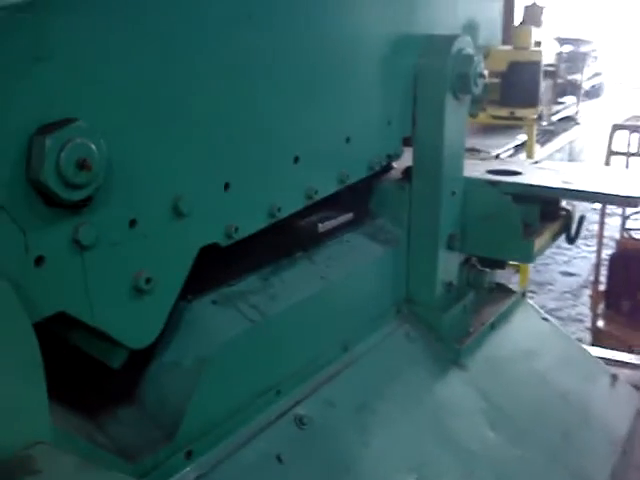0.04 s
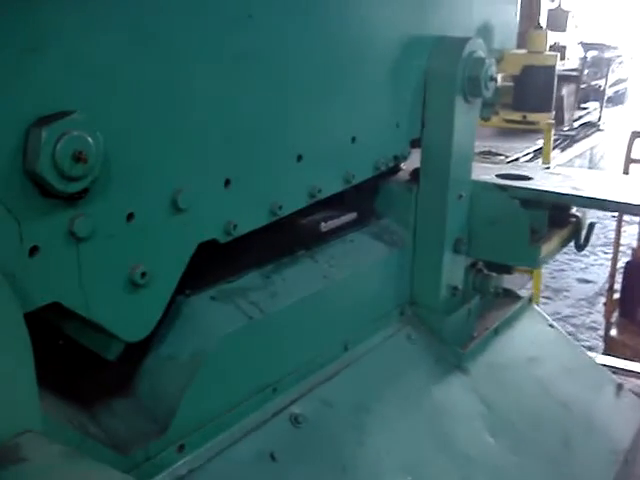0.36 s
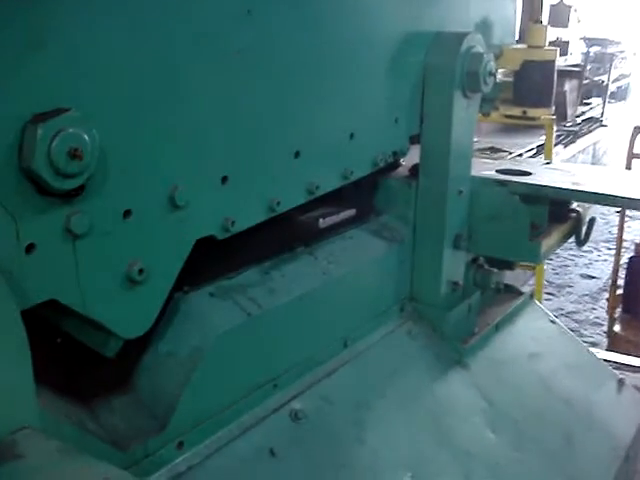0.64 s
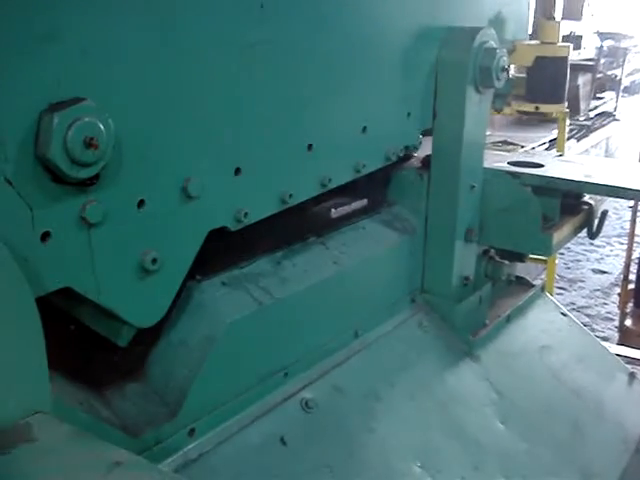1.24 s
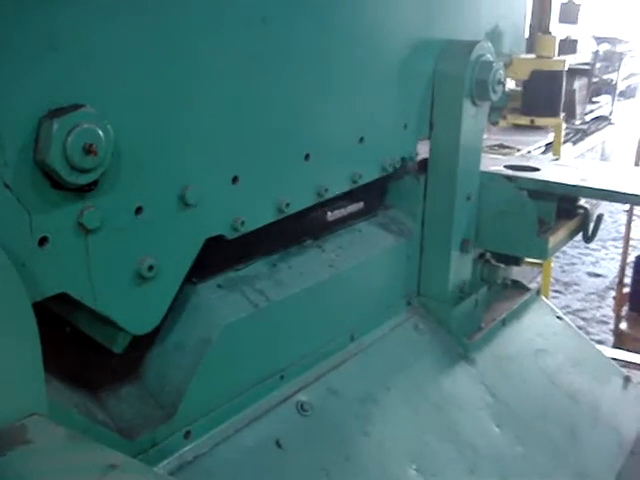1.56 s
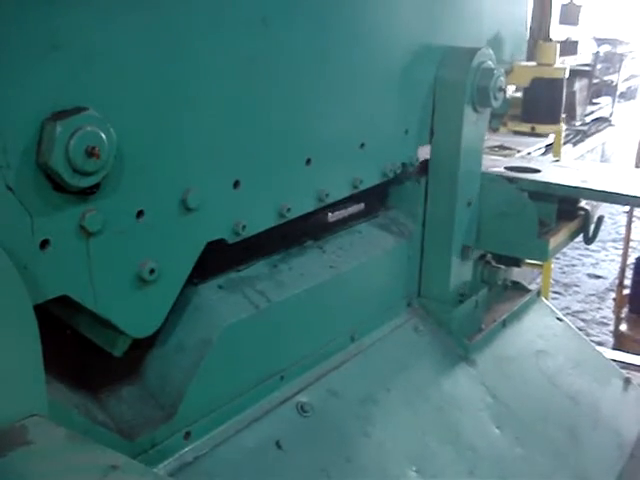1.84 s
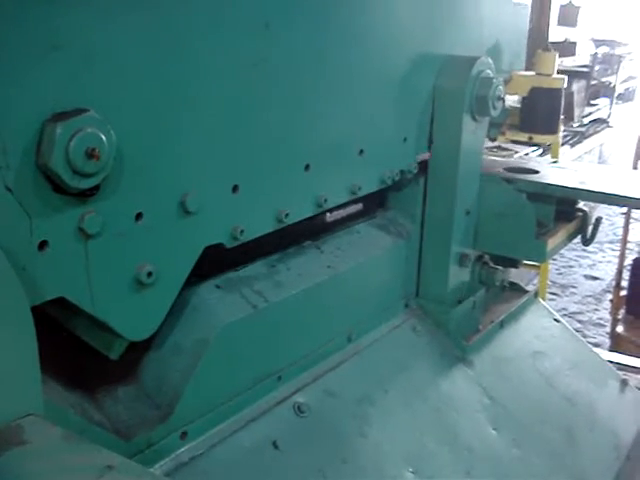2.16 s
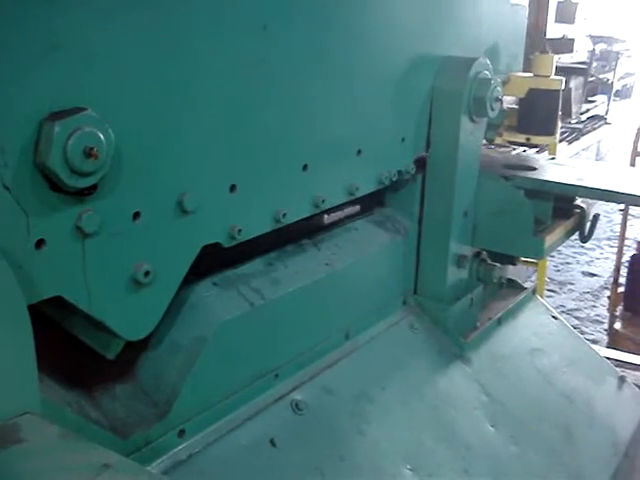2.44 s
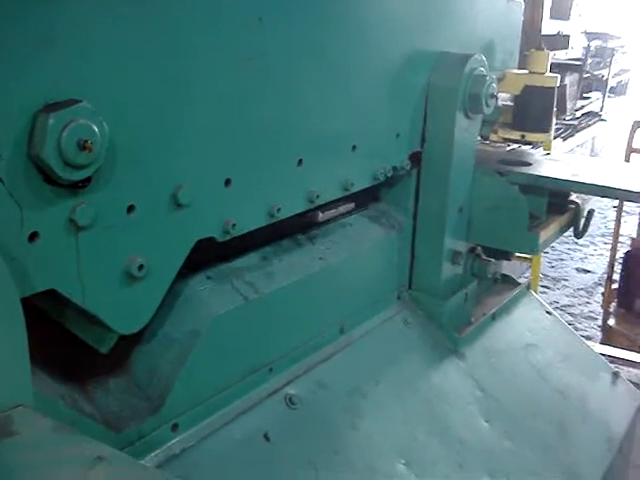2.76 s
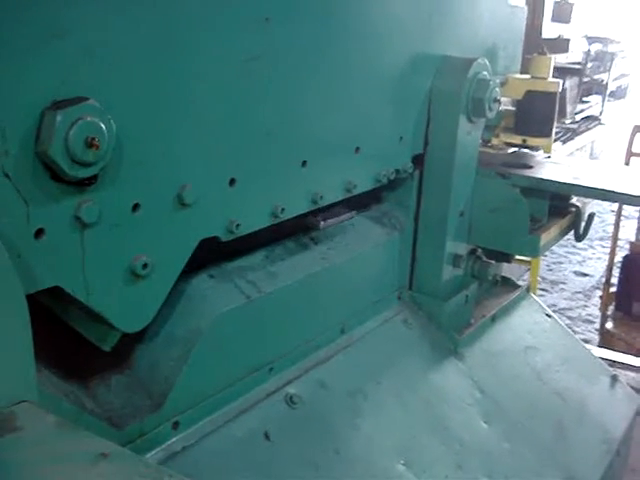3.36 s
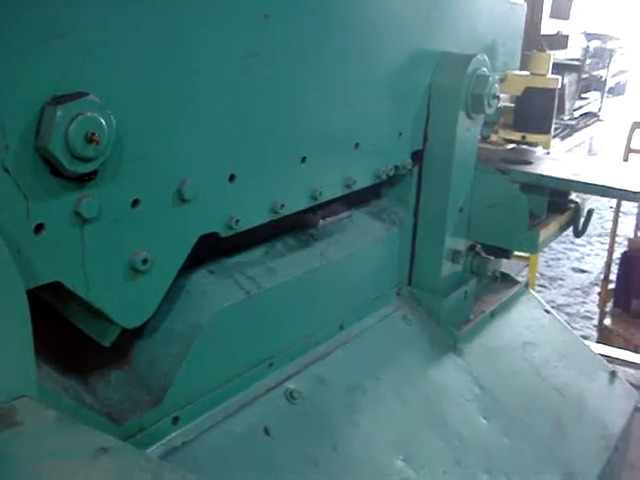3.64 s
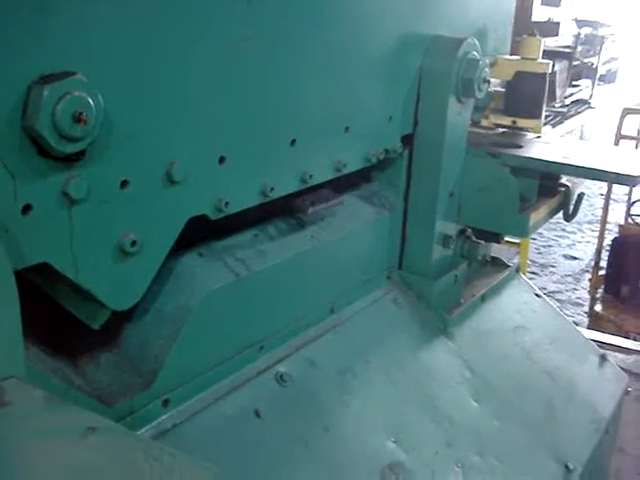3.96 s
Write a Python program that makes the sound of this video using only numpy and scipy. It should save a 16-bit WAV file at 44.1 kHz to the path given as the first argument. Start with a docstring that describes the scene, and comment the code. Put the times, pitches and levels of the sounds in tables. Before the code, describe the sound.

A large metal shearing machine idles in a workshop with a hydraulic drone and hiss. A click, a clunk and a brief whistle lead into a raspier buzz, before a soft release leaves the pump throbbing.

```python
"""Hydraulic pump of a metal shear

Nine pistons on a shaft turning about 30 times a second drone in a workshop: their pressure ripple
is a harmonic series over the broadband noise of flowing oil. The pump idles, a valve clicks, oil
rushes in with a clunk and the ram strokes under load, brighter and a little slower. Then the valve
changes over and the ram returns with a throbbing drone."""
import sys
import numpy as np
from scipy import signal
from scipy.fft import rfft, irfft
from scipy.io import wavfile
from scipy.ndimage import map_coordinates

SR = 44100
rng = np.random.default_rng(int(sys.argv[2]) if len(sys.argv) > 2 else 0)


def materialize(psi):
    """Save the field psi as 16-bit PCM at rate SR to the path in sys.argv[1].

    A 1-D psi becomes a single channel; in a 2-D psi each row is a channel.
    """
    bounded = np.clip(np.atleast_2d(psi).T, -1, 1)
    quanta = np.round(bounded * 32767).astype(np.int16)
    wavfile.write(sys.argv[1], SR, quanta)


N = 176400

PISTONS, TOP_HZ = 9, 10000
STROKE_S, LOAD_S, RETURN_S = 1.08, 1.228, 2.497  # the load follows once pressure has built up
MID_STROKE_S = (LOAD_S + RETURN_S) / 2
TIME = np.arange(N) / SR
# Piston rate, sagging under load: time_s, rate_hz
PISTON_RATE = [(0, 269.3), (.97, 269.3), (1.05, 264.6), (1.15, 267), (1.3, 266.1), (2.47, 266.15),
               (2.54, 268.3), (2.95, 267.85), (4, 267.75)]


def undb(db):
    """Amplitude ratio of a level in decibels."""
    return 10 ** (np.asarray(db) / 20)


def drift(rate_hz):
    """Smooth random fluctuation with a spread near 1."""
    points = rng.standard_normal(4096)
    return map_coordinates(points, [TIME * rate_hz + 2], order=2, mode="mirror")


def spectral_gain(hz, spectrum):
    """Gain of a (Hz, dB) spectrum, interpolated in log frequency."""
    corner_hz, level_db = np.transpose(spectrum)
    return undb(np.interp(np.log(hz + 1e-9), np.log(corner_hz), level_db))


def noise(spectrum):
    """White noise filtered to a (Hz, dB per Hz) spectral density."""
    gain = spectral_gain(np.fft.rfftfreq(N, 1 / SR), spectrum)
    return irfft(rfft(rng.standard_normal(N)) * gain, N) * np.sqrt(SR / 2)


def periodic_noise(cycles, rate_hz, spectrum, lowest_hz, size=16384):
    """A random pattern repeated every cycle has a line spectrum."""
    lines_hz = rate_hz * np.arange(size // 2 + 1)
    real, imag = rng.standard_normal((2, len(lines_hz)))
    in_band = (lines_hz > lowest_hz) & (lines_hz < TOP_HZ)
    lines = (real + 1j * imag) * spectral_gain(lines_hz, spectrum) * in_band
    pattern = irfft(lines) * size * np.sqrt(rate_hz) / 2
    return np.interp(cycles % 1, np.arange(size) / size, pattern)


def tone(cycles):
    """Sinusoid of rms 1."""
    return np.sqrt(2) * np.sin(2 * np.pi * cycles)


def bump(at_s, half_width_s):
    """Gaussian pulse of height 1."""
    return np.exp(-((TIME - at_s) / half_width_s) ** 2)


def envelope(start_s, attack_s, hold_s, decay_s):
    """Linear rise, plateau and exponential decay."""
    age = TIME - start_s
    return np.clip(age / attack_s, 0, 1) * np.exp(-np.maximum(age - attack_s - hold_s, 0) / decay_s)


def stages(stroke_s, fade_s, return_fade_s=0.057):
    """Equal-power crossfade: the gains of idle, stroke and return."""
    down = np.clip((TIME - stroke_s) / fade_s + .5, 0, 1)
    up = np.clip((TIME - RETURN_S) / return_fade_s + .5, 0, 1)
    return np.sqrt([1 - down, down * (1 - up), up])


def piston_ripple(turns, gains, load_gains, phases, throb=0.09, jitter_cycles=0.036, rasp_db_per_s=-5):
    """Periodic pressure pulses form a harmonic series, modulated in level and phase under strain."""
    # Ripple partials of the piston rate: harmonic, idle_db, stroke_db, return_db
    partials = [(1, -27.5, -39.0, -33.6), (2, -16.7, -22.7, -23.9), (3, -26.5, -21.0, -18.6),
                (4, -35.7, -33, -33.3), (5, -36.8, -31.5, -33.5), (6, -44.1, -31.8, -39.2),
                (7, -41, -36.5, -37.2), (8, -34.4, -30.3, -38.6), (9, -37.5, -33, -37.0),
                (10, -32.5, -23.7, -37.1), (11, -37.8, -35.5, -32.7), (12, -55.4, -44, -39.8),
                (13, -50.0, -40.5, -44.8), (14, -49.6, -36.5, -52.0), (15, -53.9, -37.5, -44.8),
                (16, -56.9, -43.5, -42.4), (17, -52, -41, -53), (18, -58, -46.5, -55), (19, -58, -45, -55),
                (20, -60, -47, -53)]
    # Swells and fades as the oil column changes length: time_s, harmonic, gain_db, half_width_s
    swells = [(1.1, 2, -15, .07), (1.36, 2, 6.5, .06), (1.54, 2, 3, .06), (2.5, 2, -15, .025),
              (1.3, 3, -15, .02), (1.5, 3, 2, .12), (1.643, 3, -16, .02), (2.44, 3, 3, .04),
              (2.53, 3, -9, .03), (1.38, 4, 9, .06), (1.53, 4, -10, .1), (1.48, 6, -12, .1),
              (1.3, 7, 14, .08), (1.5, 7, 11, .055), (1.24, 8, -11, .06), (1.36, 10, -13, .14),
              (2.47, 10, -7, .13), (1.27, 12, 10, .05)]
    out, strain = 0, gains[1]
    for harmonic, *levels_db in partials:
        k = round(harmonic)
        waver_db = 0.08 + strain if k < 4 else 1.24
        gain_db = waver_db * drift(16)
        gain_db += sum(db * bump(at, width) for at, order, db, width in swells if round(order) == k)
        if k >= 12:  # the rasp is strongest as the ram takes load
            gain_db += rasp_db_per_s * (TIME - MID_STROKE_S) * load_gains[1]
        if k >= 5:  # the buzz waits for the load and throbs once a turn
            amplitude = undb(levels_db) @ load_gains * (1 + throb * strain * tone(turns))
        else:
            amplitude = undb(levels_db) @ gains
        jitter = jitter_cycles * strain * drift(25.14)
        out += amplitude * undb(gain_db) * tone(k * PISTONS * turns + phases[k] + jitter)
    return out


def shaft_sidebands(turns, gains, phases, waver_db=3.0, trim_db=-2):
    """A weak piston adds sidebands that oppose the nearest ripple tone once a turn, heard as beats."""
    # Partials of the shaft rate, before the trim: harmonic, idle_db, stroke_db, return_db
    sidebands = [(12, -37.9, -50.8, -51.9), (19, -51.6, -35.6, -48.4), (20, -45.3, -40.4, -43.0),
                 (24, -38.0, -41.2, -42.9), (25, -35.2, -41.3, -41.4), (26, -53.1, -43.0, -32.3),
                 (28, -53.4, -41.3, -38.7), (29, -55.1, -43.2, -35.8), (30, -52.4, -39.8, -36.2),
                 (34, -38.3, -59.4, -61.3), (91, -58.8, -42.1, -39.2)]
    out = 0
    for harmonic, *levels_db in sidebands:
        amplitude = (undb(levels_db) @ gains) * undb(trim_db + waver_db * drift(5.04))
        out -= amplitude * tone(round(harmonic) * turns + phases[round(harmonic / PISTONS)])
    return out


def oil_and_gear(turns, gains, piston_depth=0.099, shaft_depth=0.076, flicker_db=1.05):
    """Oil hiss is amplitude-modulated; clatter repeats with the shaft, a thin whine with the pistons."""
    # Oil flow and fan noise, before the offsets below:
    # frequency_hz, idle_db_per_hz, stroke_db_per_hz, return_db_per_hz
    flow = [(30, -85, -82, -87), (111, -70.5, -82.5, -86), (164, -62.5, -72.5, -74),
            (231, -56.5, -67, -67.5), (350, -54.5, -58, -58), (421, -57, -67.5, -68.5),
            (533, -56.5, -54, -52.5), (720, -55, -54, -59), (1090, -58.5, -62.5, -62.5),
            (1520, -66, -63.5, -69), (1906, -61.5, -58, -62), (2310, -65.5, -61.5, -68.5),
            (2730, -61.5, -60.5, -66.3), (3070, -67, -64.5, -68), (4220, -69.5, -63.5, -70),
            (6450, -76, -70, -78), (8300, -80, -78.5, -78), (10100, -89, -82.5, -88)]
    hiss_db, clatter_db, whine_db = -.5, (-5, -5, -3), (-12.5, -9.5, -9.5)  # triples go by stage
    out, piston_hz = 0, PISTON_RATE[-1][1]
    pulsation = (1 + piston_depth * tone(PISTONS * turns)) * (1 + shaft_depth * tone(turns))
    for stage, gain in enumerate(gains):
        spectrum = np.array(flow)[:, [0, stage + 1]]
        hiss = undb(hiss_db + flicker_db * drift(20)) * pulsation * noise(spectrum)
        clatter = periodic_noise(turns, piston_hz / PISTONS, spectrum, lowest_hz=170)
        whine = periodic_noise(PISTONS * turns, piston_hz, spectrum, lowest_hz=4400)
        out += gain * (hiss + undb(clatter_db[stage]) * clatter + undb(whine_db[stage]) * whine)
    return out


def frame_tones(waver_db=4.5):
    """The frame vibrates in unsteady, inharmonic tones not locked to the shaft."""
    # Tones of the idling frame: pitch_hz, level_db, wander_hz
    partials = [(72, -53.5, 3.6), (358, -40, 6), (730, -40, 1.7), (797, -38, 0.56), (1830, -45.5, 2),
                (1876, -39, 2.1), (1940, -40, 1.5)]
    return sum(undb(db + waver_db * drift(5.7)) * tone(np.cumsum(hz + wander * drift(12)) / SR)
               for hz, db, wander in partials)


def frame_rings(attack_s=0.017, decay_s=0.012, gain=2):
    """Damped resonances of the frame ring briefly as the valve engages."""
    # Rings, before the gain: start_s, pitch_hz, level_db, hold_s
    rings = [(.955, 1008, -26, .025), (.99, 790, -19.5, .02), (1.05, 1035, -29, .07)]
    return gain * sum(undb(db) * envelope(at, attack_s, hold_s, decay_s) * tone(hz * TIME)
                      for at, hz, db, hold_s in rings)


def valve_click():
    """A short transient is broadband: the valve clicks in a burst of treble noise."""
    # Click spectrum: frequency_hz, density_db_per_hz
    spectrum = [(3000, -85), (6000, -78), (7800, -68), (10000, -72)]
    return noise(spectrum) * envelope(start_s=.957, attack_s=.006, hold_s=.012, decay_s=.01)


def oil_rush():
    """Inrushing oil makes a bright gush of flow noise."""
    # Rush spectrum: frequency_hz, density_db_per_hz
    spectrum = [(500, -71), (1100, -62), (1600, -52), (2200, -56), (2900, -55.5), (4500, -61),
                (7000, -67.5), (10000, -75.5)]
    return noise(spectrum) * envelope(start_s=.985, attack_s=.045, hold_s=.018, decay_s=.045)


def clunk():
    """The oil arrives with a clunk: low and middle frequencies decaying exponentially."""
    # Clunk spectrum: frequency_hz, density_db_per_hz
    spectrum = [(30, -75), (110, -77), (190, -51), (280, -50), (450, -56), (800, -48), (1300, -58.5),
                (2500, -59), (5000, -90)]
    return noise(spectrum) * envelope(start_s=1, attack_s=0.071, hold_s=0.046, decay_s=0.11)


def changeover_dips():
    """The drone's amplitude dips briefly while the valve changes over."""
    # Dips of the drone: time_s, gain_db, half_width_s
    drops = [(1.071, -8, 0.099), (2.53, -5.5, 0.041)]
    return undb(sum(db * bump(at, width) for at, db, width in drops))


def valve_squeal(pitch_hz=2695, level_db=-24.5, wander_hz=12):
    """Oil whistles through the opening valve: a flow tone with random frequency modulation."""
    whistle = tone(np.cumsum(pitch_hz + wander_hz * drift(120)) / SR)
    return undb(level_db) * whistle * envelope(start_s=1.095, attack_s=.015, hold_s=.1, decay_s=.015)


def valve_release():
    """The valve releases in a dull gush of low-frequency noise that decays exponentially."""
    # Release spectrum: frequency_hz, density_db_per_hz
    spectrum = [(40, -77), (120, -68), (200, -65), (330, -55), (600, -74), (2000, -99)]
    return noise(spectrum) * envelope(start_s=2.35, attack_s=0.04, hold_s=.12, decay_s=0.11)


def scene(flutter_hz=0.1107, easing_db_per_s=-2):
    """Superposition of the pump, in its three stages, and the transients of the valve."""
    piston_hz = np.interp(TIME, *np.transpose(PISTON_RATE)) + flutter_hz * drift(20)
    turns = np.cumsum(piston_hz) / SR / PISTONS
    gains = stages(STROKE_S, fade_s=0.19)
    idle, stroke, back = load_gains = stages(LOAD_S, fade_s=0.087)
    phases = rng.random(21)  # in cycles, indexed by ripple harmonic
    drone = piston_ripple(turns, gains, load_gains, phases) + shaft_sidebands(turns, gains, phases)
    easing = undb(easing_db_per_s * (TIME - MID_STROKE_S))  # the hiss eases as the ram travels
    oil = oil_and_gear(turns, (idle, stroke * easing, back))
    oil *= undb(-3.0 * bump(2.565, 0.071))  # the level dips briefly as the return begins
    frame = idle * frame_tones() + frame_rings()
    valve = valve_click() + oil_rush() + clunk() + valve_squeal() + valve_release()
    return (drone * changeover_dips() + oil + frame + valve)[None]


def record(dry):
    """An elliptic low-pass filter cuts the top of the spectrum steeply."""
    return signal.sosfilt(signal.ellip(12, .1, 90, TOP_HZ, fs=SR, output="sos"), dry)


dry = scene()
out = record(dry)
materialize(out)
```